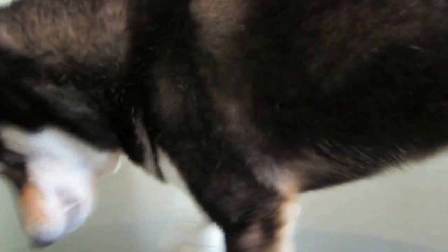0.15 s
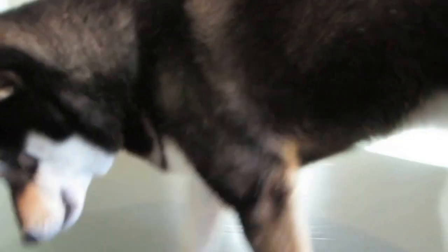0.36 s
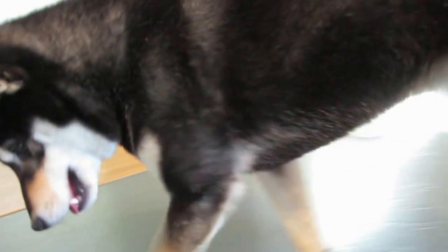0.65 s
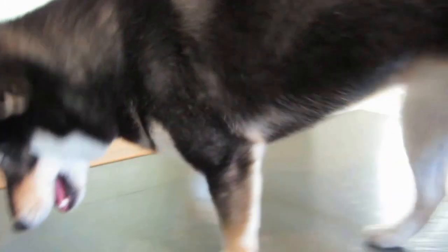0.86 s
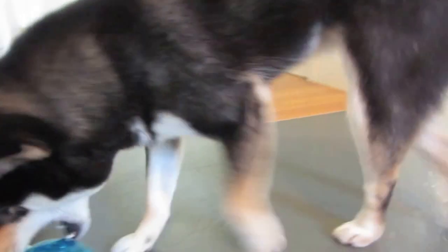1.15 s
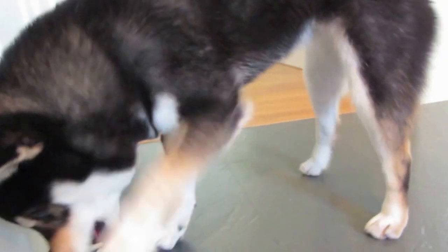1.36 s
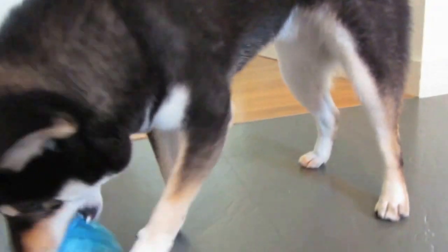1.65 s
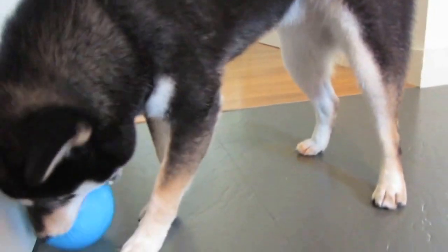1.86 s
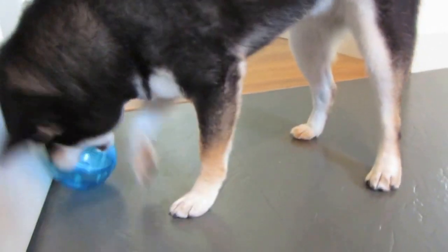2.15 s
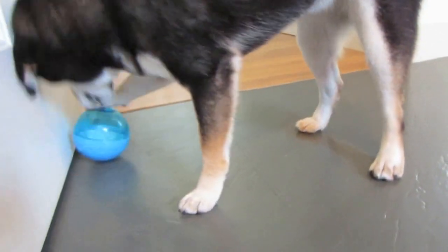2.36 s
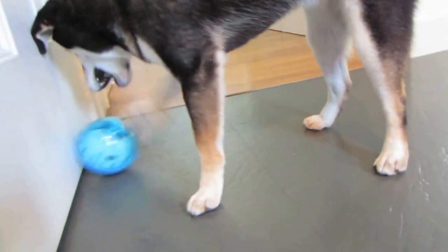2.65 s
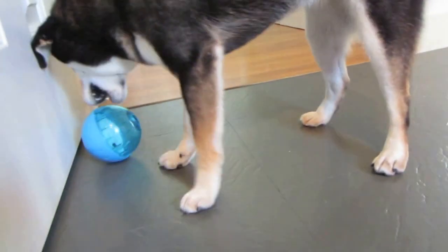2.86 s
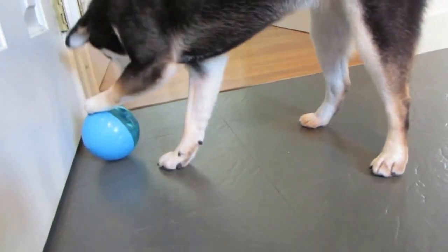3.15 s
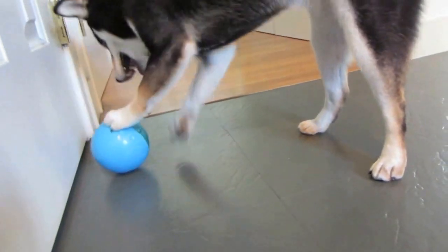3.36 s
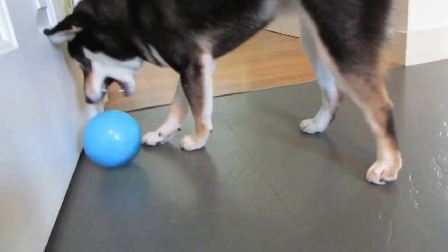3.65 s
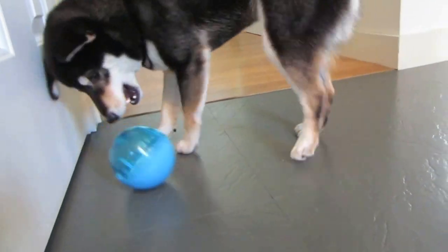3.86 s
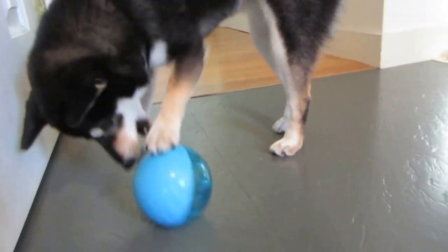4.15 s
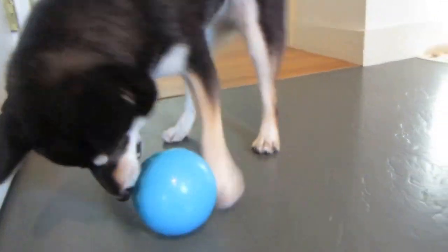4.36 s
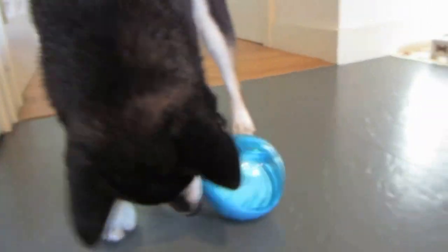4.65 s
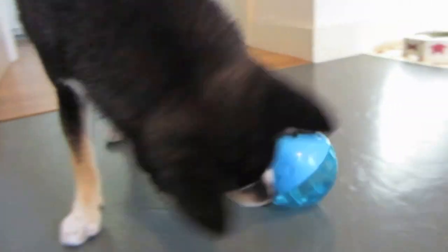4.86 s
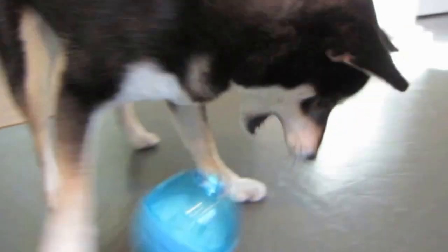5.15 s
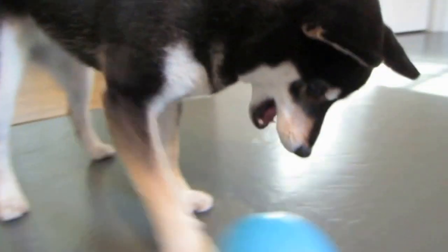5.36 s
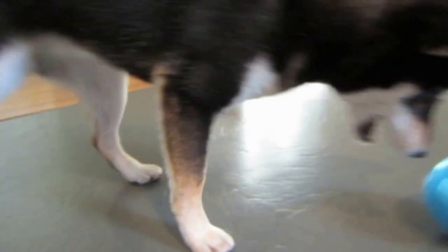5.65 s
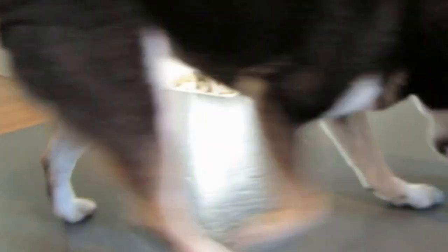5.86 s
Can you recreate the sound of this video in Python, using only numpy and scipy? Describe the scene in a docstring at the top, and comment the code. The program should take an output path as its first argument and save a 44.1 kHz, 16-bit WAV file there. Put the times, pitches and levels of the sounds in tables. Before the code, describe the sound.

Close stereo microphones in a lively kitchen: a dog pushes a hollow plastic treat ball over a hard floor. It rumbles and knocks loudly, treats rattling, then quiets to small taps and scrapes with a few sharp cracks, before a final flurry of clacks and rolling.

```python
"""Hard plastic treat ball on a kitchen floor

A dog noses and paws a hard hollow ball over the floor and against a cabinet.
Jolts from the floor's grain ring body, hollow and shell; knocks clack the shell and thud in the floor.
Dry treats and claws tick as gritty bursts, treats slide as dense contacts, scrapes are friction noise.
Two close microphone ports hear it in a live room with a faint hush and whine; the hardest knocks clip.
"""
import sys
import numpy as np
from scipy import signal
from scipy.fft import rfft, irfft
from scipy.io import wavfile

SR = 44100
rng = np.random.default_rng(int(sys.argv[2]) if len(sys.argv) > 2 else 0)


def transcribe(signal):
    """Save signal, clipped to [-1, 1], as a 16-bit WAV file at the path in sys.argv[1]."""
    frames = np.atleast_2d(signal).T
    limited = np.clip(frames, -1, 1)
    pcm = np.round(limited * 32767).astype(np.int16)
    wavfile.write(sys.argv[1], SR, pcm)


N = 264159

# Modes of floor and ball body. Each row: pitch in Hz, relative level in dB, nominal t60 in seconds.
BODY_MODES = [(65, -18.5, 0.074), (102, -16.5, 0.23), (151.6, -5.5, 0.41), (198, 5.5, 0.085),
              (244.3, 3, 0.14), (294, 1, 0.085), (350, -2, 0.059)]
# Modes of the plastic shell. Each row: pitch in Hz, relative level in dB, nominal t60 in seconds.
SHELL_MODES = [(517, 8.5, 0.016), (698, 6, 0.025), (1135, 2, 0.025), (1670, -8.5, 0.027),
               (2014, -6.5, 0.0051)]
RATTLE_RANGE_HZ = (4400, 5900)   # the shell's bright ring under treats and claws


def amp(db):
    """Gain of a level in dB."""
    return 10 ** (np.asarray(db) / 20)


def rms_one(x):
    """Scales to rms 1."""
    return x / np.sqrt(np.mean(x ** 2) + 1e-20)


def peak_one(x):
    """Scales to peak 1."""
    return x / np.abs(x).max()


def at_hz(points, hz):
    """Reads a spectrum table on a log-frequency axis."""
    points_hz, values = np.transpose(points)
    return np.interp(np.log(np.maximum(hz, 1)), np.log(points_hz), values)


def over_time(points):
    """Interpolates (seconds, value) rows to one value per sample."""
    return np.interp(np.arange(N) / SR, *np.transpose(points))


def add(out, start_s, wave):
    """Mixes a wave in at start_s."""
    i = round(start_s * SR)
    out[..., i:i + wave.shape[-1]] += wave[..., :N - i]


def ring(x, hz, t60_s):
    """Two-pole resonator: a unit click sets a decaying sine of initial height 1 ringing."""
    r, w = amp(-60 / (t60_s * SR)), 2 * np.pi * hz / SR
    return signal.lfilter([0, np.sin(w)], [1, -2 * r * np.cos(w), r * r], x + 1e-18)


def soft(x, hz):
    """Low-pass: a blunt contact has little above hz."""
    return signal.sosfilt(signal.butter(2, hz, fs=SR, output="sos"), x)


def firm(x, hz):
    """High-pass: takes out what lies below hz."""
    return signal.sosfilt(signal.butter(4, hz, "high", fs=SR, output="sos"), x)


def colour(x, spectrum):
    """Causal (minimum-phase) filter with the given dB spectrum, by cepstral folding."""
    size = 8192
    log_gain = np.log(amp(at_hz(spectrum, np.fft.rfftfreq(size, 1 / SR))))
    cepstrum = irfft(log_gain)
    cepstrum[1:size // 2] *= 2
    cepstrum[size // 2 + 1:] = 0
    response = irfft(np.exp(rfft(cepstrum)))
    return signal.fftconvolve(x, response)[:len(x)]


def grains(per_s, spread_db):
    """Random contacts with a long-tailed spread of sizes and either sign."""
    sizes = amp(spread_db * np.minimum(rng.exponential(1, N), 5)) * rng.choice([-1, 1], N)
    return sizes * (rng.random(N) < per_s / SR)


def clumps(depth_db, rate_hz):
    """Contacts bunch together: a fast random swell of level."""
    return amp(depth_db * rms_one(soft(rng.standard_normal(N), rate_hz)))


def wandering(pitch, width_hz):
    """Jolts ring in a resonance whose pitch moves; rms 1."""
    phase = 2 * np.pi * np.cumsum(over_time(pitch)) / SR
    in_phase = soft(grains(500, 2), width_hz) * np.cos(phase)
    quadrature = soft(grains(500, 2), width_hz) * np.sin(phase)
    return rms_one(in_phase + quadrature)


def bright(x, ring_hz):
    """Sharp contacts as the ports hear them, with the shell's bright ring."""
    # Each row: frequency in Hz, relative level in dB per Hz.
    treble = [(1060, -10.5), (1800, -7.5), (2120, -1), (2970, -12.5), (3350, -14), (4820, -4), (6170, -8),
              (6820, -12), (7750, -21.5), (8970, -12), (10600, -11), (12500, -13.5), (15200, -26),
              (15900, -29)]
    return rms_one(colour(x, treble)) + amp(-3) * rms_one(ring(x, ring_hz, t60_s=0.006))


def rolling(roll_db, slide_gain):
    """Floor grain jolts the ball many times a second; body, hollow and shell ring."""
    # Floor boom under the ball. Each row: time in seconds, pitch in Hz.
    boom_pitch = [(0, 226.5), (.08, 196), (.2, 222.6), (.45, 190), (.6, 221), (.68, 180), (.78, 200.4),
                  (.86, 235.9), (1.4, 217), (2.2, 237.2), (2.35, 184.4), (2.7, 219.7), (4.6, 227.6),
                  (5.12, 244.6), (5.3, 183.4), (5.45, 190), (5.62, 164.7), (5.71, 287.9), (5.79, 169.7),
                  (5.88, 174.2), (5.94, 295), (5.99, 301.3)]
    # Air inside the ball: pitch shifts as the opening turns. Each row: time in seconds, pitch in Hz.
    hollow_pitch = [(0, 474), (0.121, 450), (0.302, 350), (.45, 379), (0.621, 518), (.8, 517), (0.949, 401),
                    (1.1, 290), (1.5, 289.6), (2.001, 361.3), (3.4, 406.7), (3.55, 514.5), (3.801, 394.3),
                    (4.3, 375.2), (5.102, 340.2), (5.501, 379.2), (5.699, 487.3), (5.904, 558),
                    (5.99, 510.7)]
    loud_roll_db = -20
    hollow_db, hollow_follows = -28, 1.1   # level at a loud roll; share of the roll's swing
    drone_db, drone_follows = -36.5, 0.65   # shell drone, likewise
    drone_from_slide_db = 3   # sliding treats set the shell droning too
    boom_db, grain_db = -3.5, -4.5   # relative to the roll

    rumble = sum(amp(db) * ring(grains(300, 0.68), hz, t60_s) / np.sqrt(t60_s)
                 for hz, db, t60_s in BODY_MODES)
    hollow = wandering(hollow_pitch, width_hz=43)
    boom = wandering(boom_pitch, width_hz=31)
    floor = amp(boom_db) * boom + amp(grain_db) * rms_one(soft(rumble, 770))

    lumps = clumps(2.5, 25)
    shell = sum(amp(db) * ring(lumps * grains(900, 3.5), hz, t60_s * 0.5) / np.sqrt(t60_s)
                for hz, db, t60_s in SHELL_MODES)

    swing_db = roll_db - loud_roll_db
    hollow_gain = amp(hollow_db + hollow_follows * swing_db)
    drone_gain = amp(drone_db + drone_follows * swing_db) + amp(drone_from_slide_db) * slide_gain
    return amp(roll_db) * floor + hollow_gain * hollow + drone_gain * rms_one(soft(shell, 2700))


def knocks():
    """A clack of a few cycles at the contact's own pitch, the shell modes, and a floor thud just after."""
    # Each row: start in seconds, peak level of the clack in dB, contact pitch in Hz,
    # floor thud relative to the clack in dB.
    knock_rows = [(0.036, -18.5, 597, 2), (0.06, -18.5, 1970, -1), (0.179, -25, 1570, 12),
                  (0.322, -17.5, 2060, 3), (0.3732, -17, 924, 7.5), (0.412, -12.5, 540, 5.5),
                  (0.424, -14.5, 544, -9), (0.436, -20, 547, -2), (0.457, -20, 560, -8),
                  (0.447, -18, 635, -9), (0.475, -17, 604, -4), (0.62, -18, 540, 10.5),
                  (0.659, -15, 1156, -13), (0.706, -23, 1560, -1), (0.742, -8, 1090, -3.5),
                  (0.849, 1, 1199, -5.5), (1.131, -8, 780, -0.5), (1.169, -12.5, 649, 1.5),
                  (1.366, -10, 910, -5), (1.49, -24, 1234, -12), (1.601, -12, 753, -11),
                  (1.626, -3.5, 814, -5), (1.677, -3, 805, -2.5), (1.693, 2.5, 870, -27),
                  (1.909, -23.5, 614, -6), (2.019, -24.5, 935.6, -6), (2.117, -21, 720, -6),
                  (2.196, -20.5, 860, 4.5), (2.218, -31, 600, -2), (2.243, -22.5, 640, -9),
                  (2.264, -24, 1080, -10), (2.284, -22.5, 710, 3), (2.328, -21, 695, 0),
                  (2.433, -24, 730, -5.5), (2.684, -19.5, 1830, -2), (2.6889, 1.5, 1066, -11.5),
                  (2.88, -31, 1180, -17), (2.908, -30, 1510, -20), (3.099, -36, 810, -0.5),
                  (3.166, -38.5, 1350, 4), (3.453, -29, 613.3, 2.5), (3.483, -22.5, 590, 6.5),
                  (3.521, -5.5, 980, -10.5), (3.558, 2.5, 634, -14), (4.086, -30.5, 627, 9),
                  (4.118, -21.5, 895, 6), (4.138, -27.5, 630, 10), (4.324, -31, 1200, -17),
                  (4.371, -14.5, 727, 5.5), (4.387, -15.5, 690, 7), (4.497, -39.5, 723, 21.5),
                  (4.564, -4.5, 680, -2), (4.707, -28.5, 1529, 7), (4.813, -20, 900, 4.5),
                  (4.823, -18, 925, 6), (4.861, -24, 867, 9.5), (4.9154, -18, 892, -23),
                  (4.919, -27, 1240, -18), (5.025, -20, 734, 1), (5.056, -21, 674, 3.5),
                  (5.099, -5.5, 710, 1), (5.137, -6.5, 794, -3.5), (5.185, -8.5, 722, -1.5),
                  (5.219, -11.5, 826, -6), (5.254, -6, 776, -9), (5.273, -10, 620.5, 3.5),
                  (5.33, -8, 770, -8), (5.348, -5.5, 615, -26), (5.37, -7.5, 720, -9),
                  (5.384, -9, 590, -1.5), (5.515, -15.5, 755, 1.5), (5.6, -15, 961, -20),
                  (5.612, -14.5, 608.7, -6), (5.784, -16.5, 637.4, -9)]
    brighten_db, top_lift_db = 0.79, 5.5   # shell tilt per octave: per dB of knock, and at 0 dB
    ring_db, ring_t60_s = -18, 0.045   # the hollow rings on at the contact pitch, by a chance amount
    thud_lag_s, thud_low_hz = 0.0016, 165   # the floor answers late and gives little below this
    flex_s = 0.0011   # the wall flexes for about three milliseconds

    out, click, t = np.zeros(N), np.eye(1, 6000)[0], np.arange(6000) / SR
    luck = rng.standard_normal((len(knock_rows), len(SHELL_MODES) + len(BODY_MODES)))
    squeeze = (t / flex_s) ** 2 * np.exp(-2 * t / flex_s)
    for (start_s, peak_db, pitch_hz, thud_db), draw in zip(knock_rows, luck):
        tone = np.sin(2 * np.pi * pitch_hz * t) + 0.29 * np.sin(2 * np.pi * 1.748 * pitch_hz * t)
        contact = peak_one(squeeze * tone)
        strengths = amp(4 * draw)

        shell = np.zeros(len(t))
        for (hz, db, t60_s), strength in zip(SHELL_MODES, strengths):
            tilt_db = (brighten_db * peak_db + top_lift_db) * np.log2(hz / SHELL_MODES[0][0])
            shell += amp(db - 21 + tilt_db) * strength * ring(click, hz, t60_s * 0.65)
        ring_on = amp(ring_db) * draw[0] * ring(click, pitch_hz, ring_t60_s)
        clack = peak_one(soft(shell, 10000) - contact + ring_on)
        add(out, start_s, amp(peak_db) * clack)

        thud = sum(amp(db) * strength * ring(click, hz, t60_s * 0.98)
                   for (hz, db, t60_s), strength in zip(BODY_MODES[2:], strengths[len(SHELL_MODES):]))
        thud = peak_one(firm(soft(soft(thud, 556), 556), thud_low_hz))
        add(out, start_s + thud_lag_s, amp(peak_db + thud_db) * thud)
    return out


def ticks():
    """Treats and claws tick: a few milliseconds of gritty contact; sharper ones carry more top."""
    # Each row: start in seconds, peak level before panning in dB, gain of the top above about 13 kHz in dB.
    tick_rows = [(0.021, -12, 1.5), (0.0589, -10, 17), (0.0806, -12, 15), (0.1175, -16, 8),
                 (0.1735, -18.5, -1), (.2314, -28, -9), (0.3138, -18.5, -8), (0.3233, -22.5, -8),
                 (0.337, -31, -6), (0.3727, -24, -11), (0.383, -24, -8), (0.6119, -24.5, -4),
                 (.656, -24.5, -9), (0.688, -8.5, 38), (.7407, -31, -16), (.7542, -20.5, 2),
                 (.7711, -21.5, -15), (0.848, -10, 14), (1.073, -32, -8), (1.1316, -25.5, 6),
                 (1.171, -25.5, 24.5), (1.263, -37, -1.5), (1.3154, -9.5, -1), (1.332, -23, -7),
                 (1.4055, -23.5, -8), (1.413, -36, -10), (1.4371, -16, 26), (1.446, -28, 7),
                 (1.457, -34, 9), (1.4696, -21, 33), (1.492, -13, -8), (1.6944, -17.5, 10),
                 (1.91, -38, -16), (2.0203, -36, 14), (2.0652, -32.5, 15), (2.181, -39.5, 6),
                 (2.2273, -31, 5), (2.2413, -36, -5), (2.2667, -36, 2), (2.292, -40, -2),
                 (2.3077, -29.5, 2), (2.35, -26, 5), (2.3755, -50, -19), (2.4353, -31, -11),
                 (2.508, -33, -20), (2.6328, -37, -5), (2.673, -19, -3), (2.69, -10, 19), (2.88, -30, 2),
                 (2.908, -35, -2.5), (3.1009, -29, 20), (3.349, -43.5, -17.5), (3.4565, -34.5, 6),
                 (3.48, -15.5, 25), (3.5184, -13.5, 19), (3.559, -11.5, 21), (3.81, -38.5, -22),
                 (3.954, -43, 19), (4.0135, -30, 18), (4.0382, -27.5, 2), (4.055, -28, -6),
                 (4.0885, -27, 7), (4.117, -30, -7), (4.133, -33, 0), (4.2191, -33.5, -4),
                 (4.245, -31.5, -6), (4.311, -35.5, -4), (4.37, -19, 5), (4.384, -15.5, 2),
                 (4.401, -24, 14), (4.4305, -20.5, 13), (4.442, -30, -10), (4.4957, -22, 6),
                 (4.548, -29, -5), (4.563, -19, 27), (4.6748, -29, 23), (4.8111, -26.5, -6),
                 (4.8604, -30, 22), (4.963, -36, -12), (5.027, -30, -11), (5.1014, -15, -5),
                 (5.12, -20.5, 16), (5.1416, -30, 7), (5.1561, -13.5, 27), (5.216, -12, 31),
                 (5.254, -21, 1), (5.2733, -17.5, 7), (5.3278, -26, -7), (5.348, -17.5, -14),
                 (5.3677, -25, -16), (5.3822, -21.5, -12), (5.492, -29.5, -6), (5.5311, -16, 4),
                 (5.561, -32, -2), (5.5827, -21.5, 13), (5.6054, -20, 24), (5.755, -30, -7)]
    # Side of the ball. Each row: time in seconds, left minus right level in dB.
    ball_pan = [(0, 0), (5.4, 0), (5.55, -7.5), (5.99, -17)]
    pan_spread_db = 2   # each tick favours one port by chance

    out, t, count = np.zeros((2, N)), np.arange(1200) / SR, len(tick_rows)
    envelope = amp(-60 * t / 0.011) * (1 - np.exp(-t / 0.00083))
    grit = rng.standard_normal((count, len(t))) * envelope
    side_db = np.interp(np.array(tick_rows)[:, 0], *np.transpose(ball_pan))
    pans_db = pan_spread_db * rng.standard_normal(count) + side_db
    left_lags = rng.integers(0, 2, count)   # samples; a lag puts a tick nearer the middle
    rings_hz = rng.uniform(*RATTLE_RANGE_HZ, count)
    for (start_s, peak_db, sharp_db), burst, pan_db, left_lag, ring_hz in zip(
            tick_rows, grit, pans_db, left_lags, rings_hz):
        wave = bright(burst, ring_hz)
        dull = soft(wave, 13000)
        wave = peak_one(dull + amp(sharp_db) * (wave - dull))
        pair = np.array([np.roll(wave, left_lag), wave])
        add(out, start_s, amp(peak_db) * pair * amp([[pan_db / 2], [-pan_db / 2]]))
    return out


def slide_level():
    """Treats slide after each shove: the gain swells quickly, holds, then fades."""
    # Each row: start in seconds, level in dB, hold in seconds, fade in dB per second.
    slide_rows = [(0.026, -42, 0.07, 89), (0.334, -45, 0.018, 79), (0.673, -40.5, 0.081, 53),
                  (1.304, -42, 0.019, 119), (1.39, -44.5, 0.037, 152.5), (1.51, -43.5, 0.049, 202),
                  (1.588, -38.5, 0.06, 306), (1.806, -57, 0.041, 204), (2.202, -49.5, 0.056, 87),
                  (2.293, -67.5, 0.16, 58), (2.647, -39, 0.005, 140), (3.438, -37, 0.036, 105),
                  (3.991, -51.5, 0.017, 142), (4.188, -59.5, 0.018, 307), (4.35, -41.5, 0.078, 172),
                  (4.557, -47.5, 0.021, 90), (4.662, -54, 0.025, 85), (5.086, -37.5, 0.075, 121),
                  (5.32, -50.5, 0.088, 293), (5.516, -47.5, 0.072, 38)]
    attack_s = 0.021
    t, gain = np.arange(N) / SR, np.zeros(N)
    for start_s, db, hold_s, fade_db_per_s in slide_rows:
        swell = np.clip((t - start_s) / attack_s, 0, 1) ** 2
        fading_s = np.maximum(t - start_s - attack_s - hold_s, 0)
        gain += swell * amp(db - fade_db_per_s * fading_s)
    return gain


def sliding(slide_gain):
    """Loose treats clatter along the shell: two streams of dense tiny contacts, four bright rings each."""
    bunch = clumps(3.66, 43)

    def stream():
        """Four runs of contacts, each with its own ring pitch."""
        clatter = sum(bright(bunch * grains(500, 4), hz) for hz in rng.uniform(*RATTLE_RANGE_HZ, 4))
        return rms_one(firm(clatter, 2930))

    common, opposed = stream(), stream()   # the second has opposite signs at the two ports
    return slide_gain * np.array([common + 0.63 * opposed, common - 1.14 * opposed])


def scuffs():
    """Paw or nose scrapes softly on the shell: friction noise swells in and fades over the stroke."""
    # Each row: start in seconds, nominal level in dB, length in seconds.
    scuff_rows = [(1.582, -23.5, 0.085), (2.094, -39.5, 0.036), (2.44, -48.5, 0.086), (2.85, -46, 0.079),
                  (3.148, -44.5, 0.095), (3.42, -26, 0.16), (4.118, -34.5, 0.022), (4.309, -39, 0.032),
                  (4.706, -44, 0.082), (4.908, -39, 0.041), (4.952, -41, 0.038), (5.623, -44, 0.072),
                  (5.764, -33, 0.05), (5.863, -44.5, 0.14)]
    # Broad resonances. Each row: pitch in Hz, level in dB, t60 in seconds.
    scrape_modes = [(860, 10.5, 0.0041), (1264, 4, 0.011), (1820, 1, 0.014), (3700, -8.5, 0.018)]
    stroke = np.zeros(N)
    for start_s, db, length_s in scuff_rows:
        t = np.arange(round(1.5 * length_s * SR)) / SR
        swell = 1 - np.exp(-(t / (0.27 * length_s)) ** 2)
        add(stroke, start_s, amp(db) * np.exp(-(t / length_s) ** 4) * swell)
    friction = grains(3000, 3.1)
    scrape = sum(amp(db) * rms_one(ring(friction, hz, t60_s)) for hz, db, t60_s in scrape_modes)
    return stroke * rms_one(scrape)


def thumps():
    """Blunt pushes, perhaps the dog's weight landing, ring the two lowest floor modes."""
    # Each row: start in seconds, peak level in dB.
    thump_rows = [(0.003, -13), (0.041, -29), (0.42, -34), (0.875, -16), (2.7, -21.5), (3.581, -25),
                  (4.386, -19.5), (4.831, -25), (5.111, -15.5), (5.349, -19), (5.802, -19.5)]
    click = np.eye(1, SR // 4)[0]
    wave = peak_one(soft(sum(ring(click, hz, t60_s) for hz, _, t60_s in BODY_MODES[:2]), 160))
    out = np.zeros(N)
    for start_s, db in thump_rows:
        add(out, start_s, amp(db) * wave)
    return out


def ports(pair):
    """The left port is nearer: the right hears the direct sound slightly later."""
    right_lag_s = 45e-6
    turn = np.exp(-2j * np.pi * np.fft.rfftfreq(N, 1 / SR) * right_lag_s)
    return np.array([pair[0], irfft(rfft(pair[1]) * turn, N)])


def diffuse(length, envelope):
    """Stereo noise in half-octave bands, alike at both ports in the bass only."""
    # Reverberant field. Each row: frequency in Hz, left-right likeness from -1 to 1.
    likeness = [(40, 0.97), (150, 1), (500, 0.99), (1500, 0.44), (5000, 0.052), (15000, .05)]
    out, hz = 0, np.fft.rfftfreq(length, 1 / SR)
    alike = np.clip(at_hz(likeness, hz), -1, 1)
    mid, side = rfft(rng.standard_normal((2, length)))
    pair = np.sqrt(1 + alike) * mid + np.sqrt(1 - alike) * side * [[1], [-1]]
    for centre_hz in 30 * 2 ** np.arange(0, 9.6, 0.5):
        share = np.clip(1 - 2 * np.abs(np.log2(np.maximum(hz, 1) / centre_hz)), 0, 1)
        out = out + envelope(centre_hz) * irfft(pair * share, length)
    return out


def kitchen(x):
    """Reverberant tail that builds over a few milliseconds and dies band by band."""
    # Each row: frequency in Hz, t60 in seconds.
    room_t60 = [(100, 0.93), (300, 0.29), (900, 0.4), (3000, 0.37), (12000, 0.17)]
    t = np.arange(SR // 2) / SR
    tail = diffuse(len(t), lambda hz: amp(-60 * t / at_hz(room_t60, hz)))
    tail = tail * (1 - np.exp(-t / 0.0015))
    return signal.fftconvolve(x[None], tail / np.sqrt(np.sum(tail ** 2) / 2), axes=1)[:, :N]


def background():
    """Steady diffuse room noise and a thin steady sine whine."""
    # Each row: frequency in Hz, relative level in dB per Hz.
    hush_spectrum = [(18, -35), (30, -2), (295, -0.5), (373, -1.5), (448, -24.5), (1120, -16.5),
                     (5290, -35.5), (7640, -43), (15900, -67)]
    hush_db, whine_hz, whine_db = -53, 15734, -86
    hush = amp(hush_db) * rms_one(diffuse(N, lambda hz: amp(at_hz(hush_spectrum, hz))))
    return hush + amp(whine_db) * np.sin(2 * np.pi * whine_hz * np.arange(N) / SR)


def scene():
    """Ball, treats, room and background."""
    # How hard the ball rolls. Each row: time in seconds, floor rumble level in dB.
    roll_levels = [(0, -14), (.35, -21), (.43, -14.5), (.57, -24), (.8, -19.5), (.95, -26), (1.12, -48),
                   (1.139, -17.5), (1.19, -22), (1.26, -41), (1.33, -32.5), (1.373, -10), (1.432, -34),
                   (1.67, -25), (1.77, -36.5), (2.001, -42.5), (2.019, -30), (2.17, -36), (2.33, -26.5),
                   (2.45, -44.5), (2.6, -44), (2.699, -28.5), (3.05, -73.5), (3.398, -46), (3.471, -32.5),
                   (3.721, -33.5), (3.82, -30), (3.93, -30.5), (4.16, -31), (4.29, -43.5), (4.439, -41),
                   (4.7, -27.5), (4.85, -25.5), (5.01, -39.5), (5.09, -27), (5.289, -16), (5.65, -26),
                   (5.79, -23), (5.88, -22), (5.99, -19.5)]
    slide_gain = slide_level()
    roll = rolling(over_time(roll_levels), slide_gain) + scuffs()
    hits = knocks() + thumps()
    sharp = ticks() + sliding(slide_gain)
    wet = kitchen(amp(-11) * roll + amp(-11.5) * hits + amp(-8) * sharp.mean(axis=0))
    return ports(roll + hits + sharp) + wet + background()


def record(dry):
    """The microphone loses the deep bass, the hardest knocks clip, the top is cut."""
    bass_cut_hz, top_cut_hz = 50, 16000
    thin = signal.sosfilt(signal.butter(2, bass_cut_hz, "high", fs=SR, output="sos"), dry)
    clipped = np.clip(thin, -1, 1)
    return signal.sosfilt(signal.ellip(8, 0.5, 35, top_cut_hz, fs=SR, output="sos"), clipped)


dry = scene()
out = record(dry)
transcribe(out)
```